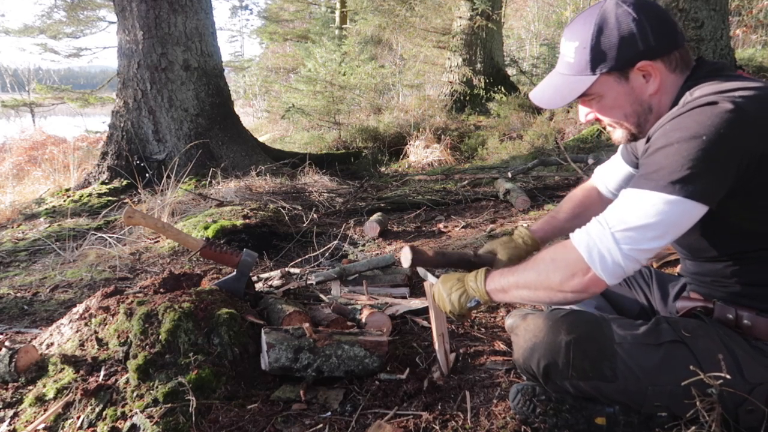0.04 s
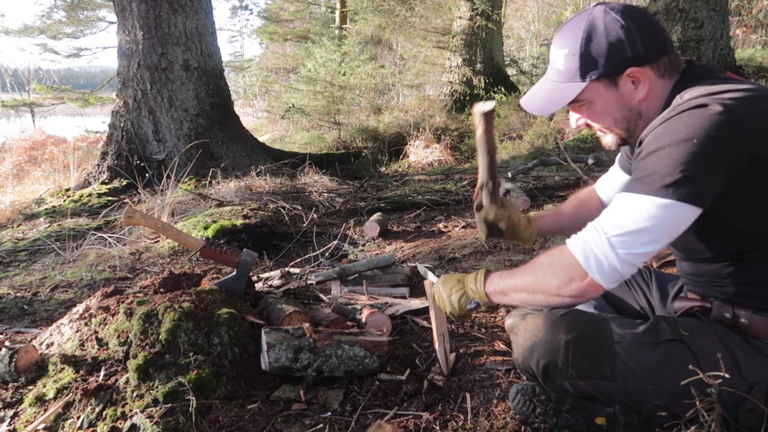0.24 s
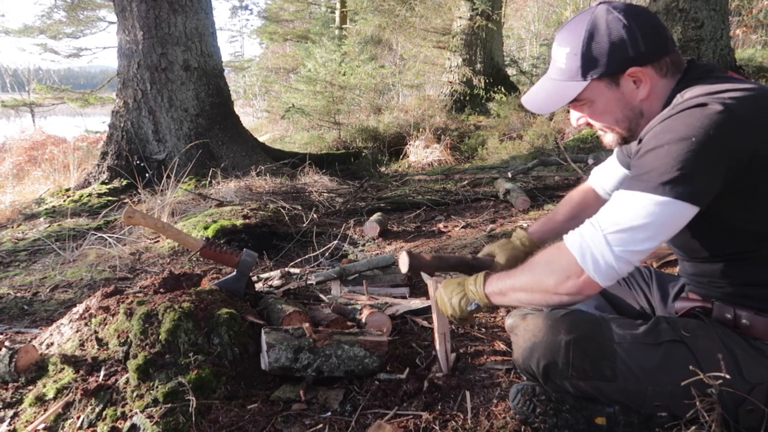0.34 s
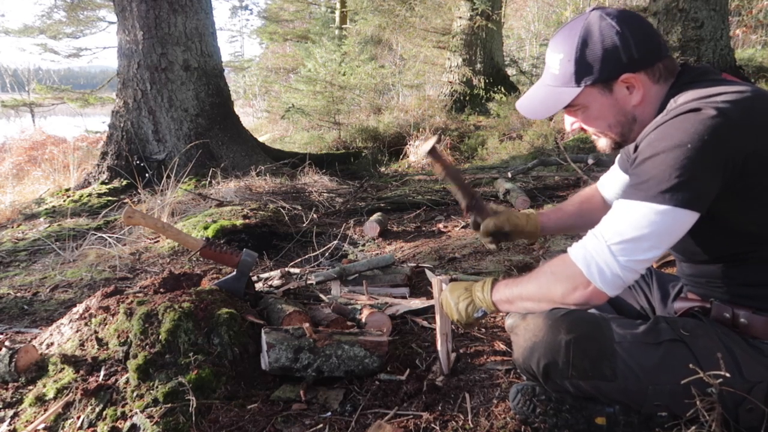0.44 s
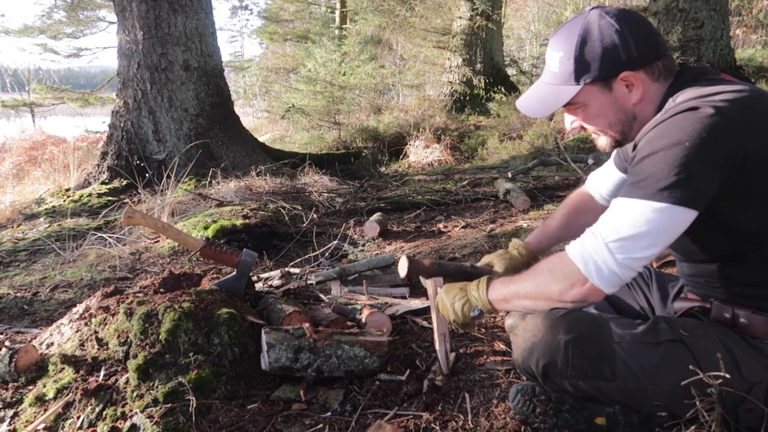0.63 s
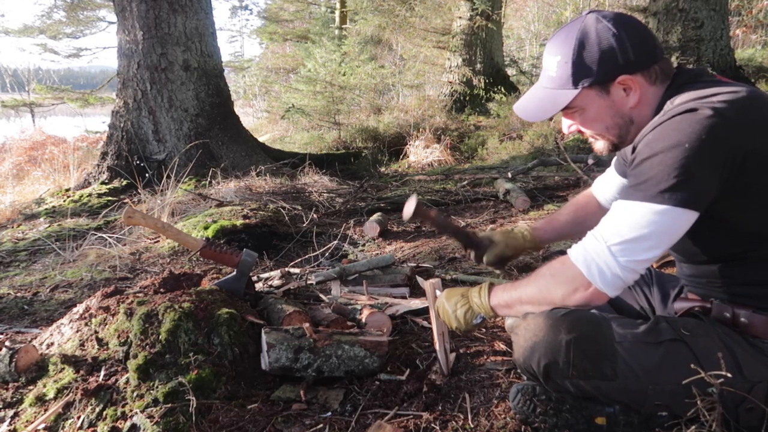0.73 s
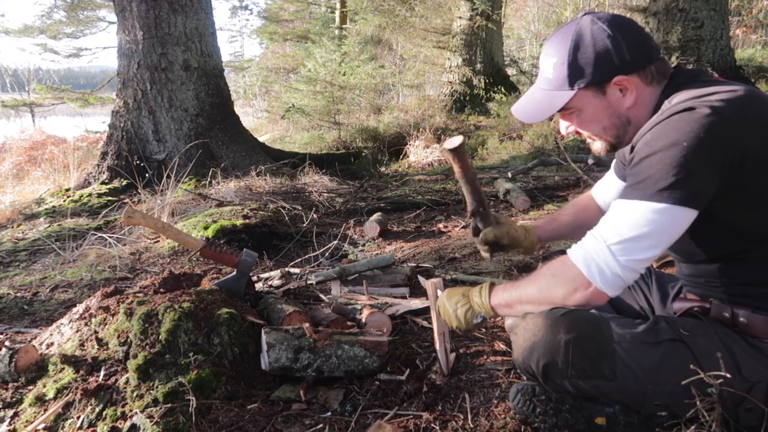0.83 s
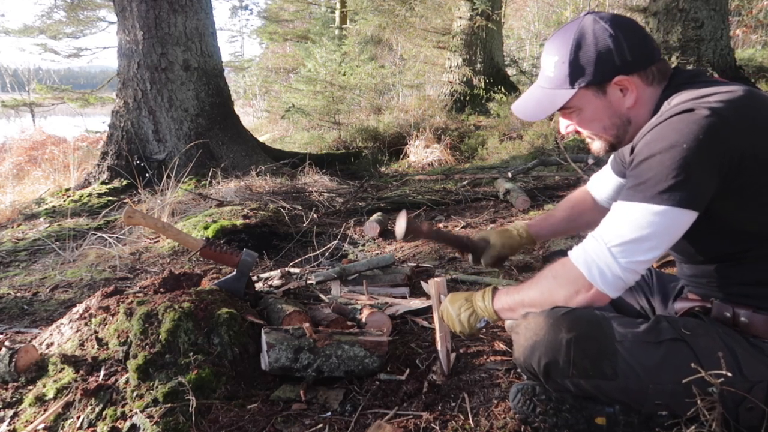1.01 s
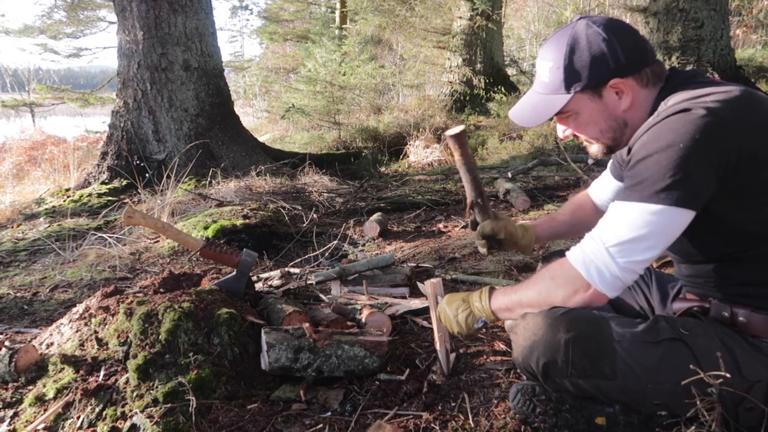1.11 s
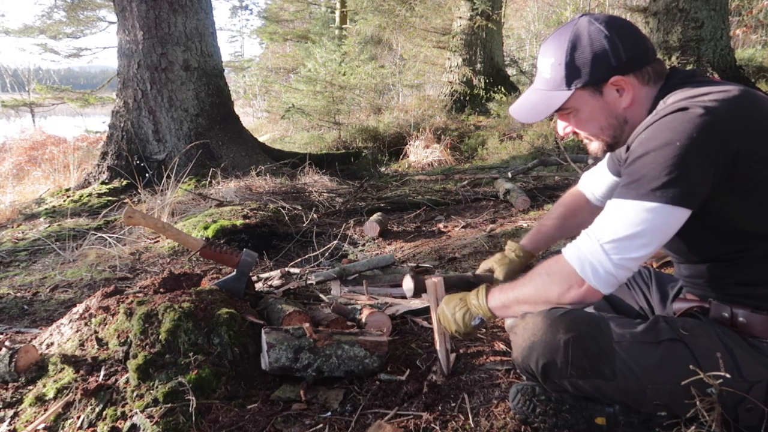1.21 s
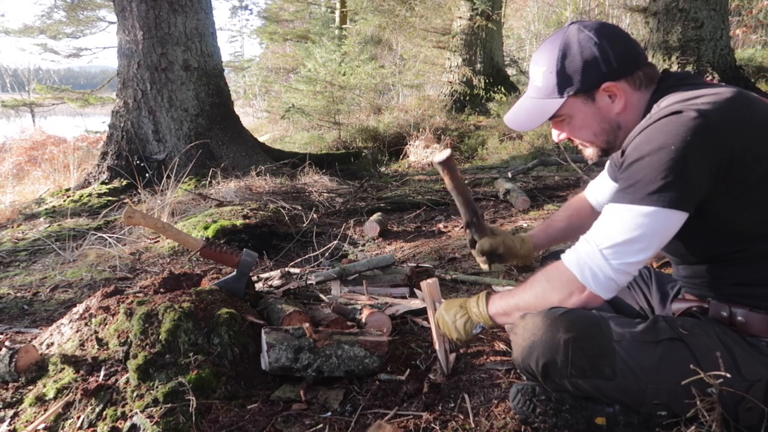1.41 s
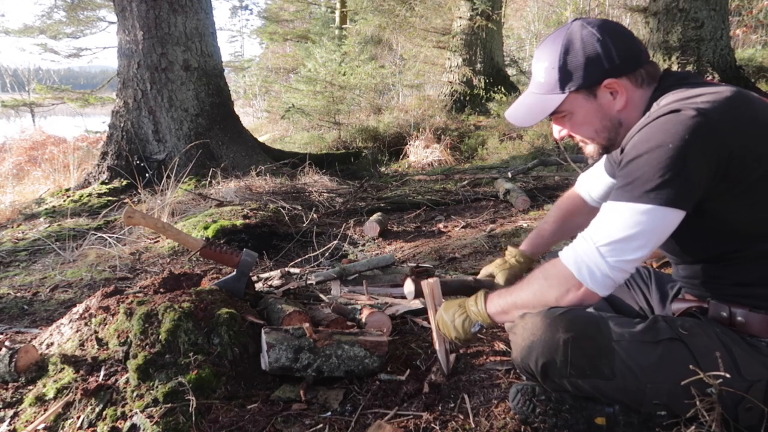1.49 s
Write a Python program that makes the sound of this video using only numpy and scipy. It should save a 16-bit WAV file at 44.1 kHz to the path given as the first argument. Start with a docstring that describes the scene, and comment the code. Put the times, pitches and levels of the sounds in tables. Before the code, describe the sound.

Five loud, dry wood-on-steel knocks splitting kindling outdoors, each with a short scattered forest echo

```python
"""Splitting kindling in a quiet forest

A wooden club drives an axe head into a billet: five evenly spaced blows.
Damped modes give the wood knock and brief steel ring; shaped noise gives the crack; low pulses thump the ground.
Decaying noise scatters each blow back from the trunks, over faint air noise.
A close pair of microphones just overloads on the hardest blows."""
import sys
import numpy as np
from scipy import signal
from scipy.fft import rfft, irfft
from scipy.io import wavfile
from scipy.ndimage import uniform_filter1d

SR = 44100
rng = np.random.default_rng(int(sys.argv[2]) if len(sys.argv) > 2 else 0)


def put_to_file(sound):
    """Save the sound as 16-bit audio at rate SR, in the file named by the first command-line argument."""
    columns = np.atleast_2d(sound).T  # one column per channel
    safe = np.clip(columns, -1, 1)
    whole_steps = np.round(safe * 32767)
    wavfile.write(sys.argv[1], SR, whole_steps.astype(np.int16))


N = 68355

# Blows: start_s, billet_db, club_db, axe_db, crack_db, push_db, billet_pitch_ratio, club_pitch_hz,
# second_bite_delay_s, second_bite_db, scatter_db
BLOWS = [(.0760, 5, 3.5, -4.5, 2.5, -5.5, 0.99, 2010, 0.00131, -7.5, -2),
         (0.3753, 2.5, 3.5, 5.5, 2, -18, 1.02, 2192, 0.00146, -24.5, -0.5),
         (0.6803, -3.5, -4.5, -2.5, -2, -23.5, 0.91, 2140, 0.0013, -17, 3),
         (0.9783, 0.8, 5, 6, 4.5, -21, 0.976, 2200, 0.000854, -22.5, -1),
         (1.2677, -3.5, 2.5, 6.5, -1, -23.5, 1.01, 2071, 0.0005, -37.5, -1)]
# Billet settling into the soil after a blow: start_s, level_db, pitch_hz
SETTLES = [(0.088, -30, 112), (0.386, -22.5, 128), (0.6864, -17, 92), (.9880, -22.5, 132),
           (1.275, -20, 112)]
# Billet modes, before the blow's pitch ratio and level: pitch_hz, level_db, t60_s
BILLET_MODES = [(253.2, -27.5, .036), (497, -16.5, .02), (613, -16.5, 0.023), (764, -12.5, 0.012),
                (935, -10.5, 0.011)]
# Club modes, relative to the blow's club pitch and level: pitch_ratio, level_db, t60_s
CLUB_MODES = [(.67, -1, 0.0072), (.86, -10, 0.012), (.95, -1, 0.011), (1.12, -9, .012)]
# Axe head modes damped by the wood, relative to the blow's level: pitch_hz, level_db, t60_s
AXE_MODES = [(2560.6, 1.5, 0.0066), (2738, -5, 0.013), (2977, -2.5, .007), (3654, -22.5, .012),
             (4750, -30, 0.014), (5690, -30, 0.0051), (6430, -37, 0.012)]
# Faint lasting note of the steel, relative to the blow's level: pitch_hz, level_db, t60_s
STEEL_MODES = [(2665, -54.5, 0.45), (2817, -52.5, 0.18)]
# Crack spectrum shape: frequency_hz, relative_level_db_per_hz
CRACK_SPECTRUM = [(300, -11), (1000, -2), (3200, 6.5), (4200, -7), (5800, -7), (7200, -14.5), (10000, -14),
                  (13000, -12.5), (16000, -29)]
# Slow sway of the springy forest floor: pitch_hz, level_db, t60_s
GROUND_MODES = [(30.8, -36, 0.38), (39.06, -40.5, 0.71), (62.5, -37.5, 0.39), (104, -34.5, .17)]
# Scatter from trunks and branches, before the blow's scatter level: frequency_hz, level_db
FOREST_SPECTRUM = [(80, -28.5), (300, -25), (800, -27.5), (1300, -20.5), (1750, -26.5), (2200, -28),
                   (2600, -26), (2790, -20), (3150, -26.5), (4000, -15.5), (5000, -12), (6000, -17),
                   (7200, -11.5), (10000, -30.5), (15000, -36.5)]
# Decay time of the scatter: frequency_hz, t60_s
FOREST_T60 = [(100, 0.32), (700, 0.17), (1800, 0.41), (2800, 0.39), (3600, 0.32), (5000, 0.28),
              (12000, 0.41)]
# Echoes from the ground, the body and the nearest trunks: delay_s, level_db
ECHOES = [(.0027, -22), (.0052, -26), (0.0267, -39), (0.0315, -35), (0.045, -44.5)]
# Air noise spectrum shape: frequency_hz, relative_level_db_per_hz
AIR_SPECTRUM = [(20, -0.5), (38, 2), (60, -7), (100, -9.5), (190, -12.5), (300, -12), (450, -17.5),
                (730, -17), (1400, -20.5), (2300, -20.5), (2800, -20.5), (3400, -24.5), (7000, -32.5),
                (11800, -41), (15000, -55.5)]

CONTACT_S = 0.00075  # the force builds while the club crushes the wood
CRACK_DB, CRACK_S = -21.5, 0.00087
SPLINTER_DB, SPLINTER_S = -15.5, 0.0075  # level relative to the crack
PUSH_HZ, PUSH_S = 123, 0.0019
SETTLE_S, SWAY_DELAY_S = 0.0027, 0.0068
REBOUND_DELAY_S, REBOUND_S, REBOUND_DB = 0.048, 0.0064, -33.5
FOREST_RISE_S = 0.01
AIR_DB, AIR_PATCHY_DB = -57, 0.5  # both rms
MIC_GAP_M, SOUND_SPEED_M_S = 0.041, 343
RIGHT_LEAD_S, RIGHT_DB, SHADE_HZ = 0.00002, 0.98, 350
CLIP_KNEE = 9.1  # exponent: higher is harder
BAND_LIMIT_HZ = 16000


def amp(db):
    """Decibels to gain."""
    return 10 ** (np.asarray(db) / 20)


def unit(x):
    """Scales to an rms of one."""
    return x / np.sqrt(np.mean(x ** 2) + 1e-20)


def read(points, hz):
    """Interpolates a table on a log-frequency axis."""
    table_hz, value = np.transpose(points)
    return np.interp(np.log(hz + 1), np.log(table_hz + 1), value)


def add(mix, start_s, sound):
    """Adds a sound in place, cut at the end of the mix."""
    part = mix[max(round(start_s * SR), 0):][:len(sound)]
    part += sound[:len(part)]


def colour(x, points):
    """Filters by a spectrum in dB."""
    size = x.shape[-1]
    gain = amp(read(points, np.fft.rfftfreq(size, 1 / SR)))
    return irfft(rfft(x) * gain, size)


def pulse(t, peak_s):
    """Rises to one at peak_s, then dies away."""
    return t / peak_s * np.exp(1 - t / peak_s)


def decay(t, t60_s):
    """Falls by 60 dB in t60_s."""
    return np.exp(-np.log(1000) * t / t60_s)


def ring(modes, t, pitch=1, lag_s=0):
    """Damped modes that swell during the contact."""
    swell = 1 - np.exp(-(t / CONTACT_S) ** 2)
    total = 0
    for hz, db, t60_s in modes:
        total = total + amp(db) * decay(t, t60_s) * np.sin(2 * np.pi * hz * pitch * (t - lag_s))
    return swell * total


def diffuse(size):
    """Noise from all directions: two close microphones agree in the bass, less so higher up."""
    a, b = rfft(rng.standard_normal((2, size)))
    coherence = np.sinc(2 * np.fft.rfftfreq(size, 1 / SR) * MIC_GAP_M / SOUND_SPEED_M_S)
    mid = a * np.sqrt((1 + coherence) / 2)
    side = b * np.sqrt((1 - coherence) / 2)
    return irfft(np.array([mid + side, mid - side]), size)


def air():
    """Faint, slightly uneven rumble and hiss of the still forest."""
    z = signal.stft(colour(diffuse(N), AIR_SPECTRUM), nperseg=512)[2]
    patches = rng.standard_normal(z.shape[1:])
    patches = uniform_filter1d(patches, size=14, axis=0)  # across frequency
    patches = unit(uniform_filter1d(patches, size=8, axis=1))  # across time
    noise = signal.istft(z * amp(AIR_PATCHY_DB * patches), nperseg=512)[1][:, :N]
    return amp(AIR_DB) * unit(noise)


def settle(t, db, hz):
    """The billet sinks back with a low thud: a short sine pulse."""
    return -amp(db) * pulse(t, SETTLE_S) * np.sin(2 * np.pi * hz * t)


def rebound(t):
    """The soil springs back once: a rise with a dip on each side."""
    u = (t - REBOUND_DELAY_S) / REBOUND_S
    return amp(REBOUND_DB) * (1 - 2 * u ** 2) * np.exp(-u ** 2)


def ground():
    """The billet settles; after each blow the soil springs up and sways on in damped modes."""
    t, out = np.arange(SR) / SR, np.zeros(N)
    for start_s, db, hz in SETTLES:
        add(out, start_s, settle(t, db, hz))
    for start_s, *_ in BLOWS:
        add(out, start_s, rebound(t))
        add(out, start_s + SWAY_DELAY_S, ring(GROUND_MODES, t))
    return out


def forest(sound):
    """A thin tail of scattered echoes, each band dying at its own speed."""
    hz, t, z = signal.stft(diffuse(SR // 2), SR, nperseg=256)
    rise = 1 - np.exp(-t / FOREST_RISE_S)
    fade = decay(t, read(FOREST_T60, hz)[:, None]) * rise
    tail = signal.istft(z * fade, SR, nperseg=256)[1]
    tail = colour(tail / np.linalg.norm(tail[0]), FOREST_SPECTRUM)
    return signal.fftconvolve(sound[None], tail, axes=1)


def near(sound):
    """Direct sound and first echoes, a little earlier on the right and louder there above the bass."""
    right = sound.copy()
    for delay_s, db in ECHOES:
        add(right, delay_s, amp(db) * sound)
    hz = np.fft.rfftfreq(len(right), 1 / SR)
    shade = amp(-RIGHT_DB * hz ** 2 / (hz ** 2 + SHADE_HZ ** 2))
    lag = np.exp(-2j * np.pi * hz * RIGHT_LEAD_S)
    left = irfft(rfft(right) * shade * lag, len(right))
    return np.array([left, right])


def push(t, db):
    """The billet pushes on the ground: a short low pulse."""
    return amp(db) * pulse(t, PUSH_S) * np.cos(2 * np.pi * PUSH_HZ * (t - CONTACT_S))


def crack(t, db):
    """Fibres crack: a sharp noise burst with a weaker, longer splintering."""
    tearing = pulse(t, CRACK_S) + amp(SPLINTER_DB) * np.exp(-t / SPLINTER_S)
    noise = unit(colour(rng.standard_normal(len(t)), CRACK_SPECTRUM))
    return amp(CRACK_DB + db) * tearing * noise


def blow(billet_db, club_db, axe_db, crack_db, push_db, billet_pitch, club_hz, bite_s, bite_db):
    """Wood and steel ring, fibres crack, the billet pushes down and the blade bites again."""
    t = np.arange(SR // 2) / SR
    billet = amp(billet_db) * ring(BILLET_MODES, t, billet_pitch, CONTACT_S)
    club = amp(club_db) * ring(CLUB_MODES, t, club_hz)
    steel = amp(axe_db) * (ring(AXE_MODES, t) + ring(STEEL_MODES, t))
    knock = billet + club + steel
    out = knock + crack(t, crack_db) + push(t, push_db)
    add(out, bite_s, amp(bite_db) * knock)
    return out


def scene():
    """Five blows with their echoes, over ground and air."""
    out = air() + ground()
    for start_s, *strike, scatter_db in BLOWS:
        sound = blow(*strike)
        for channel, direct, tail in zip(out, near(sound), forest(sound)):
            add(channel, start_s, direct)
            add(channel, start_s, amp(scatter_db) * tail)
    return out


def record(dry):
    """Soft overload at full scale, then the band limit."""
    clipped = dry / (1 + abs(dry) ** CLIP_KNEE) ** (1 / CLIP_KNEE)
    lowpass = signal.firwin(255, BAND_LIMIT_HZ, window=("kaiser", 9), fs=SR)
    return signal.oaconvolve(clipped, lowpass[None], "same")


dry = scene()
out = record(dry)
put_to_file(out)
```